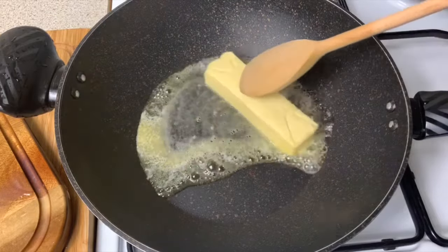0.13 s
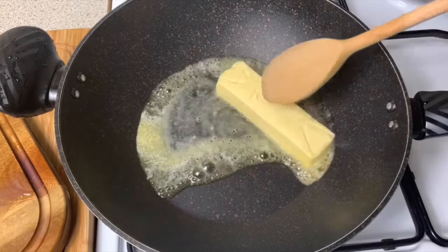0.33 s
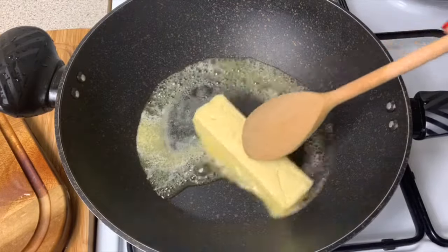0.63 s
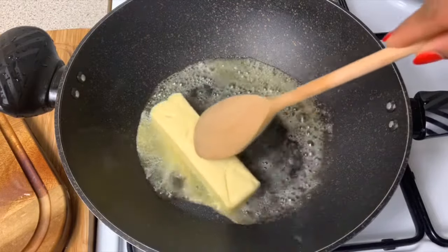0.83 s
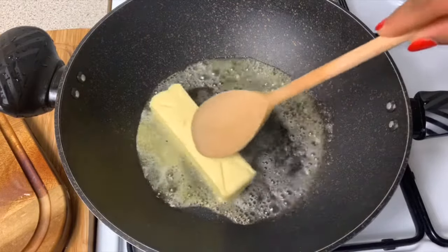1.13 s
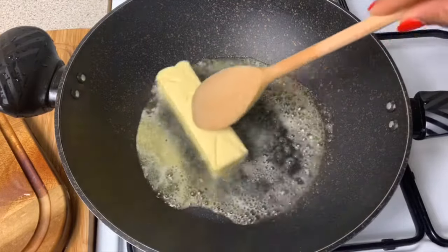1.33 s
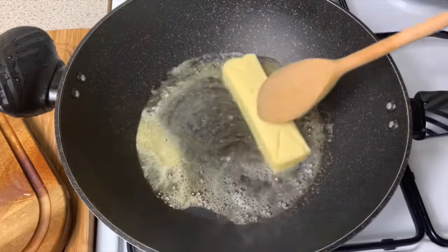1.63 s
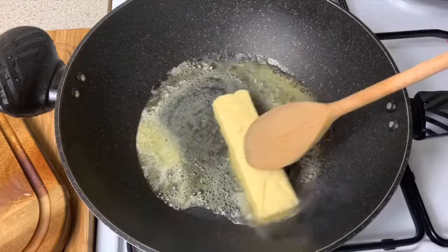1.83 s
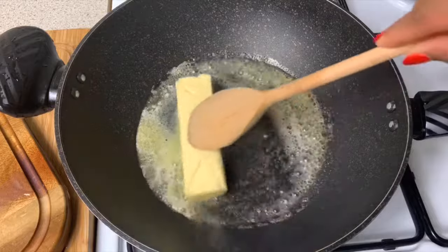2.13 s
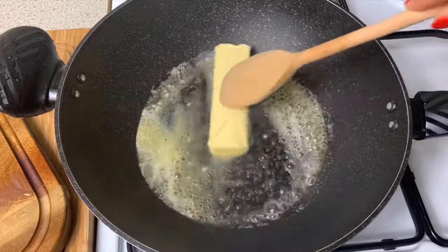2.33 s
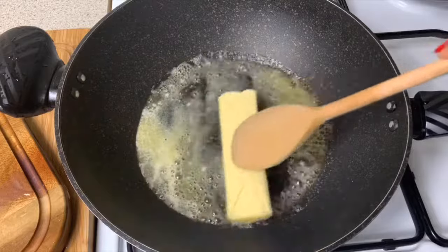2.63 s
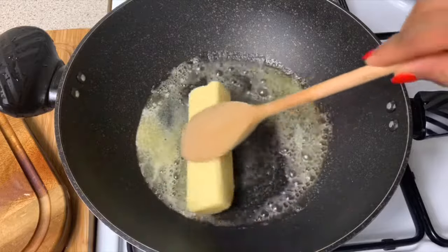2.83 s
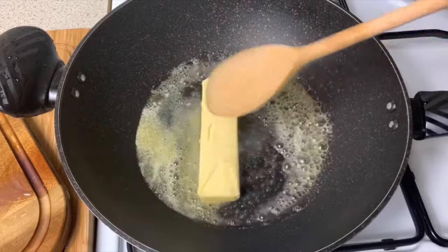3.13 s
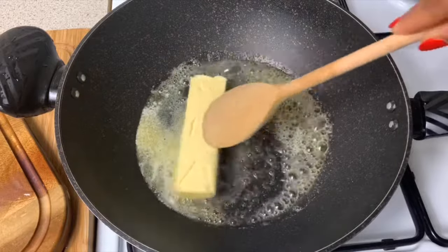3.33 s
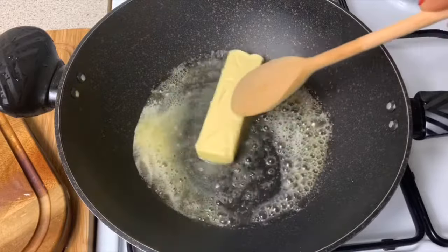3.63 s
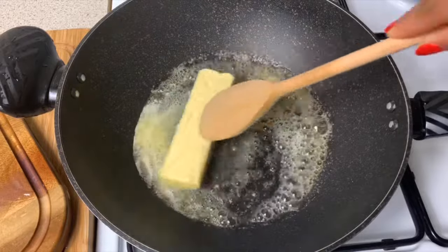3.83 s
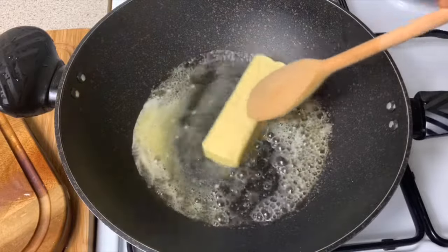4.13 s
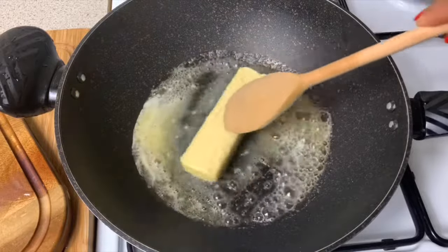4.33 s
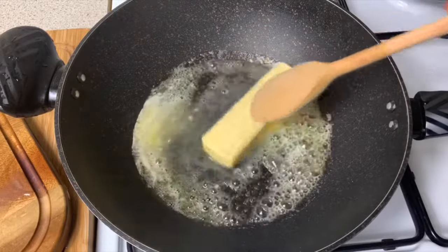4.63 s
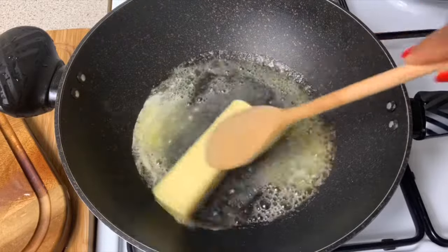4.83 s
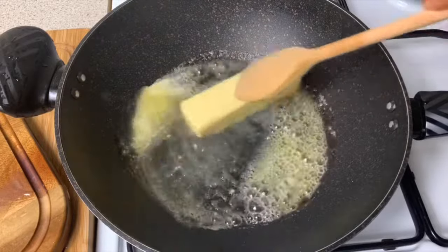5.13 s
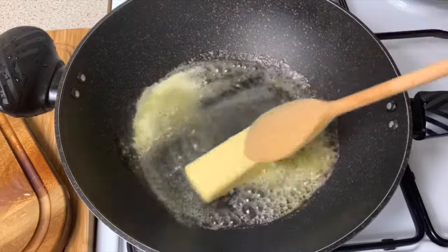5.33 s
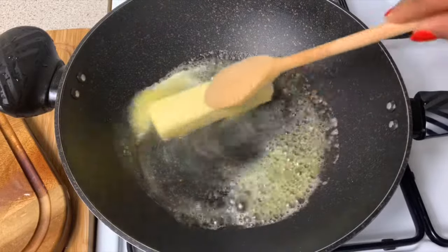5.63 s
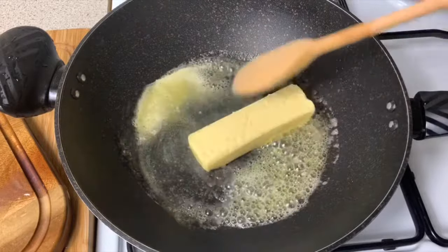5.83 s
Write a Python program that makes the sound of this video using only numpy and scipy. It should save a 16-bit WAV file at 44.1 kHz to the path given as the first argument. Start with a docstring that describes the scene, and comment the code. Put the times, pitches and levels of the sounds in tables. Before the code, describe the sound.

Close, lively frying of butter in a metal wok, crackling and sputtering in uneven flares, slowly easing over six seconds in a small kitchen.

```python
"""Butter sizzling in a hot wok

A stick of butter sizzles in a wok on a gas hob while a wooden spoon slides it about.
Water boils out of the fat as thousands of tiny bubbles, each burst a short decaying ring.
Larger ones pop, spit and sputter where the stick ploughs the foam, in tones, cracks and runs of bursts;
the spoon gives one light tick. The bowl rings faintly and echoes the bursts into a small kitchen.
Filtered noise makes the burner's murmur; low sines make a mains hum and soft bumps of the wok."""
import sys
import numpy as np
from scipy import signal
from scipy.fft import rfft, irfft
from scipy.io import wavfile

SR = 44100
rng = np.random.default_rng(int(sys.argv[2]) if len(sys.argv) > 2 else 0)


def transcribe(signal):
    """Save signal, clipped to [-1, 1], as a 16-bit WAV file at the path in sys.argv[1]."""
    frames = np.atleast_2d(signal).T
    limited = np.clip(frames, -1, 1)
    pcm = np.round(limited * 32767).astype(np.int16)
    wavfile.write(sys.argv[1], SR, pcm)


N = 263718  # length in samples


def gain_of(db):
    """Decibels to a factor."""
    return 10 ** (np.asarray(db) / 20)


def evened(x):
    """Scales to rms 1."""
    return x / np.sqrt(np.mean(x ** 2) + 1e-20)


def read(points, hz):
    """Reads a curve of (Hz, value) points on a log-frequency axis."""
    point_hz, value = np.transpose(points)
    return np.interp(np.log(hz + 1), np.log(point_hz), value)


def add(mix, s, sound):
    """Mixes a sound in from time s, in seconds."""
    part = mix[max(round(s * SR), 0):][:len(sound)]
    part += sound[:len(part)]


def coloured(x, points):
    """Filters by a curve of (Hz, dB) points."""
    hz = np.fft.rfftfreq(len(x), 1 / SR)
    return irfft(rfft(x) * gain_of(read(points, hz)), len(x))


def drift(rate_hz):
    """Slow random wandering of rms 1, up to about the given rate."""
    hz = np.fft.rfftfreq(N, 1 / SR)
    return evened(irfft(rfft(rng.standard_normal(N)) / (1 + (hz / rate_hz) ** 2), N))


def resonate(x, hz, width_hz):
    """A resonance of gain 1 at its peak."""
    return signal.lfilter(*signal.iirpeak(hz, hz / width_hz, SR), x)


def thinned(x, lowest_hz=900):
    """Small bursts radiate little bass."""
    return signal.lfilter(*signal.butter(2, lowest_hz, "high", fs=SR), x)


def burst(hz, cycles, glide, ring_slope=0.2, damping=0.86, size=400):
    """A bubble's cavity rings for a few cycles, more if it is small, its pitch rising as the film opens."""
    turns = np.arange(size) * hz / SR
    age = turns / (cycles * (hz / 5000) ** ring_slope)
    envelope = (age * np.exp(1 - age)) ** damping
    bend = 1 + glide * (np.tanh(age / 4) - .5)
    return envelope * np.sin(2 * np.pi * turns * bend)


# Colour of the frying. Each row: frequency in Hz, level in dB per Hz.
SIZZLE_COLOUR = [(250, -10.5), (520, -17), (800, -14.5), (1100, -12.5), (1400, -18), (1900, -13.5),
                 (2800, -8), (3700, -5.5), (4500, -3), (6500, 0.13), (8200, -1.5), (11500, -3), (13300, -8),
                 (14300, -9), (15800, -14.5)]
# How unequal the bursts of each size are. Each row: bubble pitch in Hz, spread in dB.
BURST_SPREAD = [(1500, 2.5), (2700, 2.5), (4500, 1.5), (8000, -1), (15000, 1)]
SIZZLE_DB = -32  # rms, before the bowl's ringing


def bubbles(per_s=4000, cap=4.26, cycles=0.63, glide=0.12, surge_db=0.22, swell_db=0.53, swell_hz=6, count=64):
    """Bubbles of many sizes burst at random, in small surges, each size from its own spot in the wok."""
    t = np.arange(0, N / SR, .01)
    swell = swell_db * drift(swell_hz)[(t * SR).astype(int)]
    surge = surge_db * rng.standard_normal(len(t)) + swell
    out = np.zeros(N)
    for hz in np.geomspace(1100, 15500, count):
        boil = boil_db(t, hz)
        level_db = boil - boil.mean() + surge
        # small bubbles outnumber large ones
        chance = per_s / count * np.sqrt(hz / 5000) / SR
        luck = rng.random(N) / chance
        at = np.flatnonzero(luck < 1)
        # the rarer a burst, the louder; the quieter where the spread is negative
        rarity = np.minimum(-np.log(luck[at]), cap)
        sizes = gain_of(read(BURST_SPREAD, hz) * rarity)
        sizes /= np.linalg.norm(sizes)
        clicks = np.zeros(N)
        clicks[at] = (-1) ** at * sizes * gain_of(np.interp(at / SR, t, level_db))
        ring = kitchen(evened(burst(hz, cycles, glide)))
        # sizes are spaced by ratio, so each higher one covers a wider band
        out += np.sqrt(hz) * signal.oaconvolve(clicks, ring)[:N]
    return gain_of(SIZZLE_DB) * evened(coloured(out, SIZZLE_COLOUR))


# The water boils off at its own rate for each size. Each row: bubble pitch in Hz, level change in dB per s.
BOIL_OFF = [(1500, -1.0), (3000, -0.87), (5000, -1.36), (8000, -0.88), (12000, -0.6)]
# Butter pushed onto hotter metal flares up, mostly in bubbles of one size; a negative rise is a lull.
# Each row: start in seconds, length in seconds, rise in dB, bubble pitch in Hz.
BOIL_FLARES = [(0.02, 0.13, -4.5, 13000), (0.333, 0.059, 3, 5570), (0.52, 0.85, 3, 10900),
               (0.603, 0.67, 2, 5550), (0.85, .5, 1, 7000), (1.994, 0.27, 1.1, 7000),
               (1.528, 0.058, -0.5, 10000), (1.77, 0.42, 4, 4370), (1.877, 0.75, 1, 11500),
               (2.397, 0.36, 4.5, 4360), (2.787, 0.84, 4.5, 5600), (3.685, 0.36, 4, 6000),
               (4.217, 0.18, 3, 6400), (4.427, 0.085, -2.5, 10000), (4.73, 0.18, 2, 9500),
               (5.04, 0.054, -4.5, 9350), (5.117, .4, 1.5, 11800), (5.55, 0.42, 2.5, 5500)]
FLARE_ATTACK_S, FLARE_RELEASE_S, FLARE_OCTAVES = 0.055, 0.071, 0.79


def boil_db(t, hz):
    """How hard bubbles of one pitch boil at t: a steady decline, plus flares that rise, hold and die away."""
    level_db = read(BOIL_OFF, hz) * t
    for start, length, rise_db, centre_hz in BOIL_FLARES:
        attack = np.clip((t - start) / FLARE_ATTACK_S, 0, 1)
        release = np.exp(-np.maximum(t - start - length, 0) / FLARE_RELEASE_S)
        nearness = np.exp(-(np.log2(hz / centre_hz) / FLARE_OCTAVES) ** 2)
        level_db = level_db + rise_db * attack * release * nearness
    return level_db


# Big bubbles bursting one by one.
# Each row: start in seconds, level of the ring in dB, pitch in Hz, ring in cycles (as at 5 kHz).
BIG_POPS = [(0.032, -23.0, 2760, 0.56), (0.248, -22.0, 4200, 0.86), (0.278, -20.5, 7460, 1.7),
            (0.397, -18.0, 6200, 0.8), (0.557, -20.5, 4120, 1.4), (0.672, -21, 4270, 2),
            (0.69, -13.0, 8210, 0.5), (0.724, -9, 5760, 0.84), (0.775, -14.5, 6280, 0.43),
            (1.165, -25, 4600, 1.8), (1.188, -14.0, 5100, 0.7), (1.262, -16.0, 7040, 1.8),
            (1.287, -17, 5860, 1.8), (1.398, -15, 3040, 1.2), (1.407, -18.0, 3530, 0.64),
            (1.414, -17, 8440, 1.3), (1.43, -14, 7780, 0.57), (1.451, -21, 2790, 0.5),
            (1.458, -14, 7060, 1.4), (1.479, -17.5, 7100, 0.95), (1.489, -14, 9040, 0.46),
            (1.529, -12.5, 4830, 1.1), (1.533, -24, 2750, 0.82), (1.619, -22, 3740, 0.87),
            (1.664, -25, 3000, 1.3), (1.693, -19.5, 3060, 0.5), (1.89, -17, 4990, 0.56),
            (1.92, -20, 4650, 1.3), (2.02, -17.5, 4670, 2), (2.058, -20, 5960, 0.7),
            (2.121, -18.5, 2980, 0.43), (2.121, -17, 6620, 0.7), (2.207, -11, 7240, 0.65),
            (2.266, -17, 3080, 0.62), (2.268, -22, 2280, 0.83), (2.287, -19.5, 5880, 0.95),
            (2.327, -19.5, 7100, 1.3), (2.349, -19.5, 3820, 1.2), (2.36, -19, 5980, 1.3),
            (2.381, -17.5, 6930, 1.3), (2.383, -17, 3030, 0.71), (2.448, -16.5, 4750, 0.95),
            (2.632, -12, 4370, 1), (2.701, -15, 6700, 0.95), (2.71, -16.5, 6310, 0.5),
            (2.727, -19.5, 4800, 0.95), (2.753, -15, 6800, 1), (2.849, -20.5, 5670, 0.95),
            (2.882, -19.5, 5970, 0.95), (2.912, -18.5, 6310, 0.78), (2.958, -19, 6190, 0.54),
            (2.977, -17.5, 6920, 0.42), (2.999, -19, 6600, 1.2), (3.019, -17.5, 6130, 1.3),
            (3.066, -18.5, 5580, 0.95), (3.139, -16, 5790, 0.7), (3.148, -26.0, 3280, 0.35),
            (3.231, -18, 5810, 1.5), (3.314, -17, 8030, 0.95), (3.394, -18.5, 5200, 0.5),
            (3.404, -23, 2780, 0.85), (3.414, -31.0, 2790, 1.8), (3.434, -27, 2710, 0.64),
            (3.871, -15, 5800, 0.7), (3.945, -19.0, 2550, 0.95), (3.969, -26, 2200, 0.57),
            (4.011, -19.5, 8120, 1.1), (4.033, -16, 4600, 0.95), (4.042, -18, 5300, 0.7),
            (4.071, -14.5, 3660, 0.88), (4.099, -20.5, 5540, 1.3), (4.126, -28.5, 3190, 0.7),
            (4.295, -26, 4780, 1.1), (4.351, -20, 5860, 0.95), (4.373, -18.0, 7520, 0.79),
            (4.392, -19, 4550, 0.64), (4.411, -23.5, 8090, 1.8), (4.442, -23, 4680, 0.95),
            (4.527, -31.5, 2440, 0.86), (4.532, -18.0, 7460, 0.76), (4.69, -23, 3550, 0.99),
            (4.71, -20.5, 2960, 0.92), (4.747, -32, 3010, 1.5), (4.787, -21, 7680, 1.8),
            (5.0, -24.0, 7460, 1.3), (5.018, -20, 8100, 0.46), (5.027, -24, 6010, 1.6),
            (5.04, -27, 7860, 1.8), (5.067, -17, 5140, 1.4), (5.097, -16, 3640, 0.72),
            (5.138, -24.5, 2540, 0.7), (5.157, -22.0, 9800, 0.5), (5.242, -26.0, 4500, 0.65),
            (5.269, -26, 2810, 0.7), (5.29, -28, 2760, 0.7), (5.317, -25, 3320, 0.95),
            (5.343, -25.5, 3000, 0.66), (5.412, -24, 8030, 0.95), (5.478, -19, 6150, 0.7),
            (5.495, -18.0, 9270, 0.56), (5.511, -18, 7250, 0.95), (5.624, -15, 7590, 0.5),
            (5.641, -16.5, 6930, 0.95), (5.696, -22, 5180, 0.5), (5.753, -30.0, 3120, 0.95),
            (5.772, -22, 4650, 1.1), (5.813, -17.5, 6410, 1.4), (5.889, -31, 2910, 0.95),
            (5.899, -22.0, 4680, 1.2), (5.933, -20, 5510, 1.3), (5.961, -17.5, 8120, 0.7)]


def pops(glide=0.024, snap_db=-7, snap_pitch=1.6, snap_cycles=0.075):
    """Big bubbles: the film snaps, then the cavity rings, some with a clear pitch, some dead at once."""
    out = np.zeros(N)
    for s, db, hz, cycles in list(BIG_POPS) + stray_pops():
        snap = gain_of(snap_db) * burst(hz * snap_pitch, snap_cycles, 0)
        pop = gain_of(db) * (burst(hz, cycles, glide) - snap)
        add(out, s, kitchen(pop, near_db=-7.0, near_t60=0.16, room_db=-8.0))
    return out


# Lesser pops; the level is the middle of the spread before the boil shifts it.
STRAY_PER_S, STRAY_DB, STRAY_SPREAD_DB = 60, -25, 4
STRAY_LOW_HZ, STRAY_HIGH_HZ, STRAY_CYCLES = 3925, 8500, 1.3


def stray_pops():
    """Lesser pops at random moments, as loud as the boil is hard, in rows like those of the big pops."""
    rows = []
    for when, size, luck in rng.random((int(STRAY_PER_S * N / SR), 3)):
        s = when * N / SR
        hz = STRAY_LOW_HZ * (STRAY_HIGH_HZ / STRAY_LOW_HZ) ** size
        db = STRAY_DB + boil_db(s, hz) + STRAY_SPREAD_DB * (2 * luck - 1)
        rows.append((s, db, hz, STRAY_CYCLES))
    return rows


# Sharp spits of fat, and at 3.16 s a light tick of the spoon.
# Each row: start in seconds, level in dB before the trim, pitch in Hz, knock on the wok in dB,
# length of the spray in seconds, spray in dB; knock and spray count from the crack.
SPITS_AND_TICK = [(2.2514, -5.5, 10500, -10, 0.00043, -10), (2.4916, -10, 10400, -13, .0026, -5),
                  (3.1602, -25, 5000, 0, 0.0011, -13), (3.682, -10, 10300, -5.5, 0.0028, 3),
                  (3.9159, -15, 7540, -24, 0.0041, 7.5), (4.1415, -11, 8700, -7, 0.0031, -15),
                  (4.2452, -17.5, 6600, -19, 0.0025, 8), (4.6029, -2.5, 8500, -11.5, 0.0014, -16),
                  (4.9684, -10.5, 7660, -3, 0.00078, -4), (5.2683, -20, 6000, -12, 0.003, 0),
                  (5.3428, -27.5, 8500, -11, .001, -4)]


def spits_and_tick(cycles=0.39, snap_db=-9, snap_hz=12500, snap_cycles=0.12, trim_db=0.5, count=12):
    """A trapped drop of water explodes: crack, thin snap, knock and spray; the spoon's tick is built alike."""
    out = np.zeros(N)
    for s, db, hz, knock_db, spray_s, spray_db in SPITS_AND_TICK:
        crack = burst(hz, cycles, 0) - gain_of(snap_db) * burst(snap_hz, snap_cycles, 0)
        hit = np.zeros(2 * len(crack))
        for when, size in zip(rng.random(count), rng.standard_normal(count)):
            add(hit, 2 / hz + when * spray_s, size * crack)
        # the spray is set against the energy of the crack
        hit *= gain_of(spray_db) * np.linalg.norm(crack) / np.linalg.norm(hit)
        add(hit, 0, crack)
        hit = thinned(hit)
        add(hit, 0, gain_of(knock_db) * knock())
        add(out, s, kitchen(gain_of(db + trim_db) * hit, near_db=-6.0, room_db=-14))
    return out


# Colour of a knock on the thin metal of the bowl. Each row: frequency in Hz, relative level in dB.
KNOCK_COLOUR = [(250, -20), (550, -14.5), (1100, -9.5), (1750, -7), (2900, 3.5), (4500, 4.5), (9000, -26),
                (15000, -35)]


def knock(lag_s=0.000372, lag_hz=1000, size=512):
    """Bending waves cross the bowl treble first, so a knock is a quick downward chirp."""
    hz = np.fft.rfftfreq(size, 1 / SR)
    # the delay is lag_s at lag_hz and falls with the root of frequency
    phase = -2 * np.pi * 2 * lag_s * np.sqrt(hz * lag_hz)
    chirp = irfft(gain_of(read(KNOCK_COLOUR, hz)) * np.exp(1j * phase))[:size // 2]
    return chirp / abs(chirp).max()


# Steam sputters out from under the sliding stick, in runs that glide. Each row: start in seconds,
# length in seconds, start pitch in Hz, end pitch in Hz, rms level in dB before the trim.
STEAM_RUNS = [(0, .1, 2720, 2700, -39), (0.583, .15, 11900, 11000, -28), (0.883, 0.16, 5050, 5800, -27.5),
              (1.22, .12, 11900, 11000, -28), (1.342, 0.21, 3100, 2500, -36),
              (1.599, 0.15, 3300, 4270, -33.5), (2.017, .2, 4700, 8400, -30), (2.2, 0.24, 2200, 2630, -38),
              (2.486, .06, 12000, 11600, -29), (3.39, .12, 2720, 2160, -42), (3.656, .015, 5500, 8500, -27),
              (3.914, .13, 2280, 1970, -41), (4.026, .13, 4670, 3070, -35),
              (4.567, 0.048, 7400, 5870, -29.5), (4.658, 0.11, 3830, 2780, -43),
              (5.009, 0.096, 7500, 4500, -33), (5.26, .095, 2930, 2970, -42),
              (5.868, 0.12, 4340, 5800, -34.5)]


def sputters(per_s=300, spread_db=4.0, scatter=0.22, cycles=0.72, glide=0.1, trim_db=-10.5, size=300):
    """Runs of like-sized bubbles; their pitch follows the pocket of steam under the stick."""
    out = np.zeros(N)
    for start, length, start_hz, end_hz, db in STEAM_RUNS:
        run = np.zeros(round(length * SR) + 400)  # room for the last burst
        for place, luck, detune in rng.random((size, 3))[:int(per_s * length) + 1]:
            pocket_hz = start_hz * (end_hz / start_hz) ** place
            hz = pocket_hz * (1 + scatter * (2 * detune - 1))
            swell = np.sqrt(np.sin(np.pi * place))
            loudness = gain_of(-spread_db * np.log(luck + 0.078))
            add(run, place * length, swell * loudness * burst(hz, cycles, glide))
        add(out, start, kitchen(gain_of(db + trim_db) * evened(run)))
    return out


def crackle(per_s=60, level_db=-26, spread_db=6, hz=7000, cycles=.2):
    """Thin films of foam snap in dry, pitchless ticks, as loud as the boil is hard."""
    at = np.flatnonzero(rng.random(N) < per_s / SR)
    chance_db = spread_db * rng.uniform(-1.2, 1, len(at))
    clicks = np.zeros(N)
    clicks[at] = (-1) ** at * gain_of(level_db + boil_db(at / SR, hz) + chance_db)
    return kitchen(signal.oaconvolve(clicks, burst(hz, cycles, 0)))[:N]


# Ringing of the bowl. Each row: frequency in Hz, width in Hz, level in dB against the direct sound.
BOWL_MODES = [(493.4, 7.8, 12), (759, 34, 5), (1139, 11.4, 3.5), (1670, 17, -0.5), (1831, 31, -4),
              (3200, 6.6, 1), (6670, 23, -2)]


def wok(x):
    """The bursts set the bowl's resonances ringing faintly."""
    return x + sum(gain_of(db) * resonate(x, hz, width_hz) for hz, width_hz, db in BOWL_MODES)


# Echoes off the bowl, spoon and hob. Each row: delay in seconds before random scaling, level in dB.
EARLY_ECHOES = [(.0007, -22.5), (.00136, -10), (.00197, -14), (.0038, -14), (.0056, -20.5), (.0061, -10.5),
                (.0069, -10.5)]


def kitchen(x, near_db=-6, near_t60=0.29, room_db=-9, room_t60=1.0, size=14000, count=30):
    """From one spot in the wok: echoes blurred by curved surfaces, scatter around the hob, the room's tail."""
    t = np.arange(size) / SR
    response = np.zeros(size)
    for db, t60 in ((near_db, near_t60), (room_db, room_t60)):
        tail = rng.standard_normal(size) * gain_of(-60 * t / t60)
        response += gain_of(db) * tail / np.linalg.norm(tail)
    response[0] += 1  # direct sound
    for delay, db in EARLY_ECHOES:
        blur = rng.standard_normal(count) * np.hanning(count)
        add(response, delay * rng.uniform(.85, 1.05), gain_of(db) * blur / np.linalg.norm(blur))
    return signal.oaconvolve(x, response)


# Soft bumps as the wok shifts on its stand under the spoon. Each row: centre in seconds,
# peak of the upper tone in dB, its pitch at the centre in Hz, length in seconds.
WOK_NUDGES = [(0.252, -42.5, 178, 0.029), (0.799, -46, 220, 0.042), (1.004, -50, 185, .044),
              (2.894, -48, 53, .15), (3.143, -45.5, 190, .085), (3.28, -48, 52, 0.21),
              (3.93, -46, 51.5, 0.091), (3.97, -51, 229.4, 0.079), (4.697, -48, 50.8, .16),
              (5.594, -47, 227, 0.037), (5.794, -41.5, 55, 0.092)]


def nudges(sag=.08, body_db=-9, body_share=.68):
    """Soft, low bumps of the wok on its stand: a sagging tone over a lower body."""
    t, out = np.arange(N) / SR, np.zeros(N)
    for s, db, hz, length in WOK_NUDGES:
        age = np.clip(2 * (t - s) / length, -4, 4)
        turns = np.cumsum(hz * (1 - sag * np.tanh(age))) / SR + rng.random()
        tone = np.sin(2 * np.pi * turns)
        body = gain_of(body_db) * np.sin(2 * np.pi * body_share * turns)
        out += gain_of(db) * np.exp(-age ** 2) * (tone + body)
    return out


# Colour of the gas flame's murmur. Each row: frequency in Hz, level in dB per Hz.
FLAME_COLOUR = [(20, -28), (38, -21), (55, -0.5), (69, -7.5), (88, -13), (111, -15), (134, -4),
                (165, -15.5), (200, -14.5), (228, -5), (285, -15), (400, -18.5), (650, -23), (1500, -25)]
FLAME_DB = -48  # rms, before the flutter
# Tones of the hum. Each row: frequency in Hz, rms level in dB before the waver.
HUM_TONES = [(50, -58), (89.5, -59.5), (100, -63)]


def burner(flutter_db=1.57, waver_db=0.5):
    """The flame murmurs as fluttering filtered noise; a hum of sines wavers under it."""
    t = np.arange(N) / SR
    flame = evened(coloured(rng.standard_normal(N), FLAME_COLOUR))
    flame = flame * gain_of(FLAME_DB + flutter_db * drift(21.0))
    hum = np.zeros(N)
    for hz, db in HUM_TONES:
        level = gain_of(db + waver_db * drift(2.4))
        hum += level * np.sqrt(2) * np.sin(2 * np.pi * (hz * t + rng.random()))
    return flame + hum


def scene():
    """Frying in the bowl, heard in the kitchen, over the hob."""
    bursts = thinned(sputters() + pops() + crackle()) + spits_and_tick()
    frying = wok(bubbles() + bursts)
    return (frying + burner() + nudges())[None]


EDGE_HZ = 15850


def record(dry):
    """Band limit: a steep low-pass ends the treble at the edge."""
    low_pass = signal.firwin(511, EDGE_HZ, window=("kaiser", 9), fs=SR)
    return signal.oaconvolve(dry, low_pass[None], "same")


dry = scene()
out = record(dry)
transcribe(out)
```